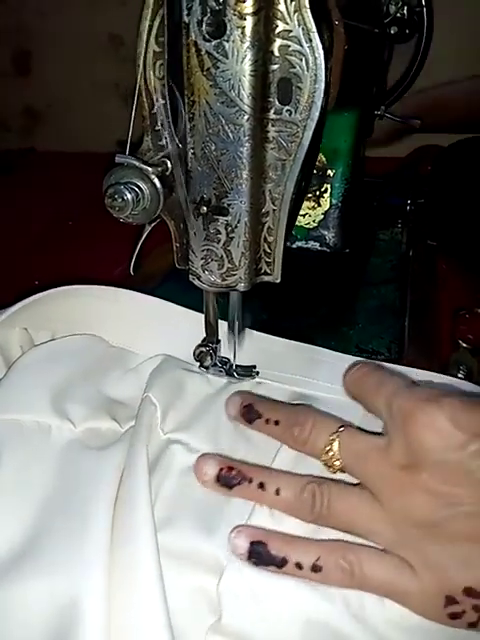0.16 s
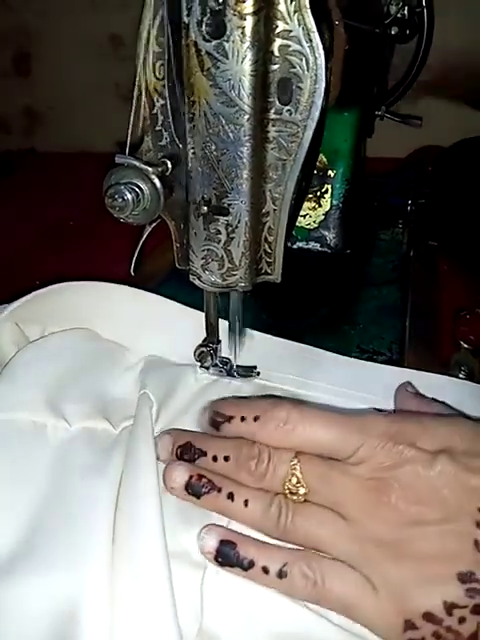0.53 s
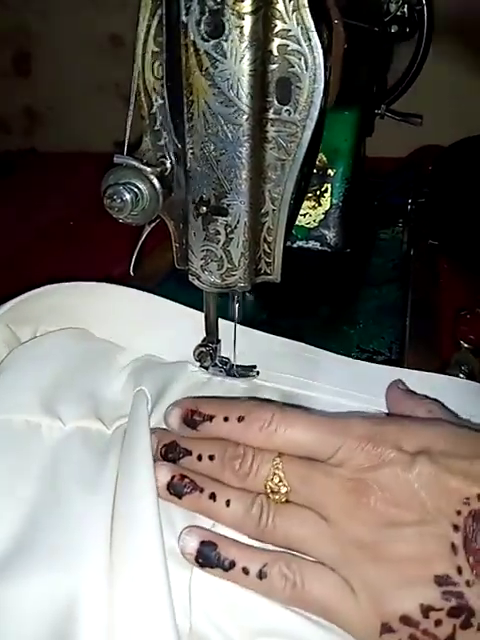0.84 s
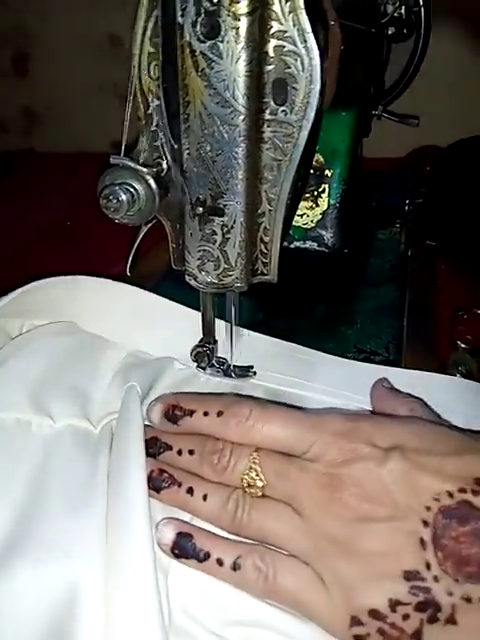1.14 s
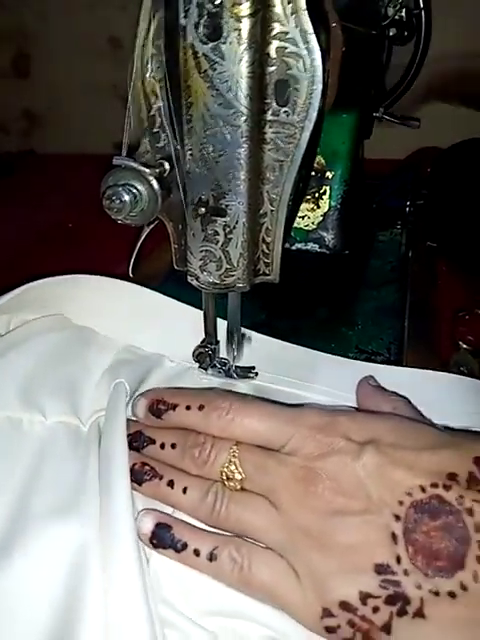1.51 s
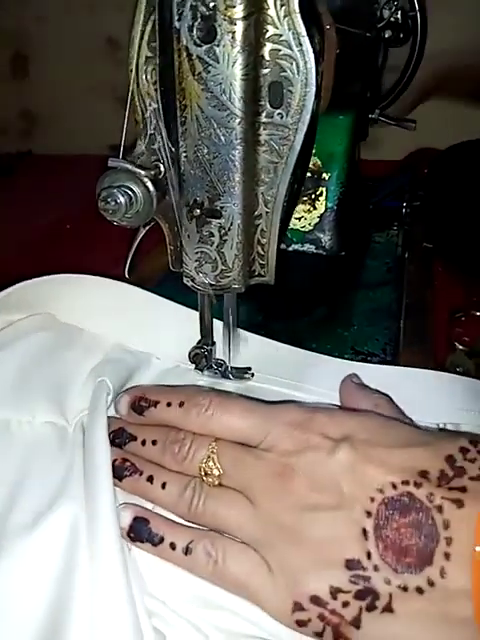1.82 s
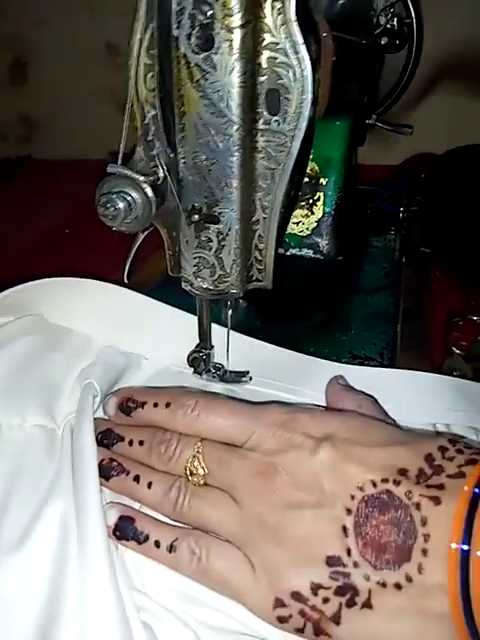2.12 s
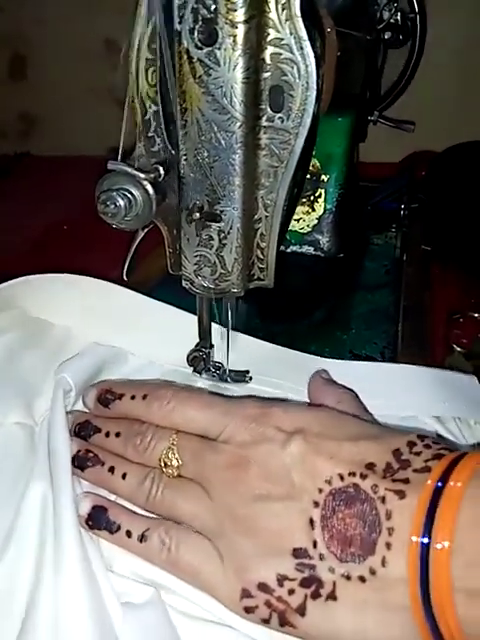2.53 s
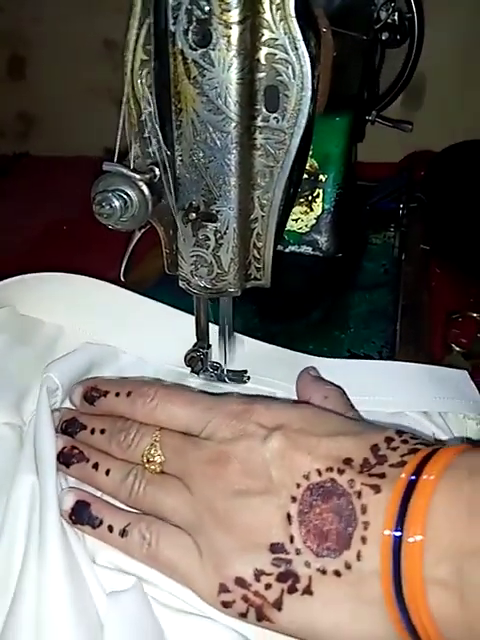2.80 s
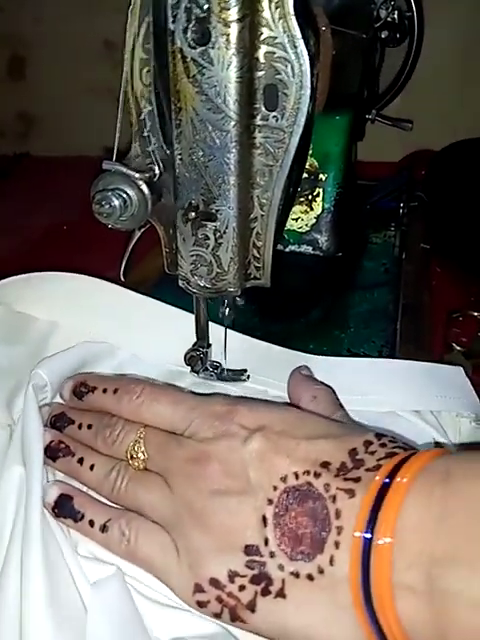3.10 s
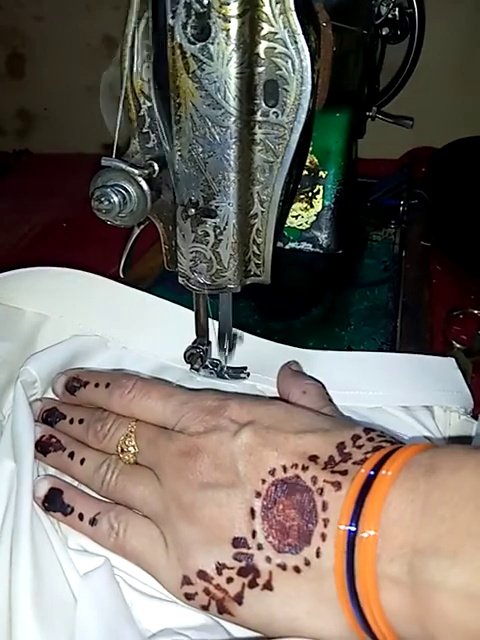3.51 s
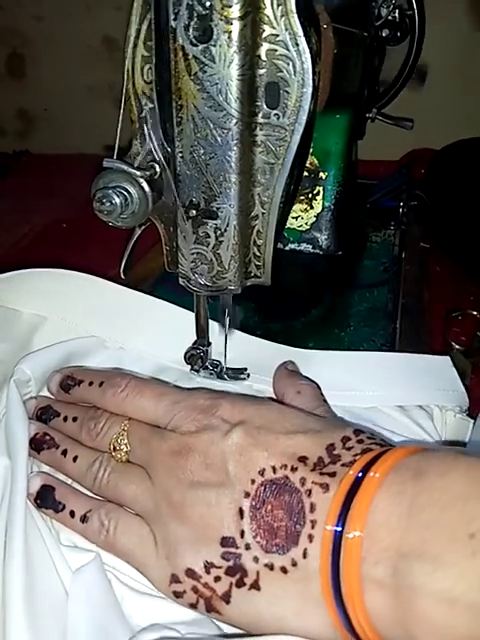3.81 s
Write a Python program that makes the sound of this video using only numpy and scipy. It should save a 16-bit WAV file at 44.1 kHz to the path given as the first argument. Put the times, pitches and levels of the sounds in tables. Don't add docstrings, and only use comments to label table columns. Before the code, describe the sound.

Sewing machine stitching cloth, heard close and dry indoors; gears rumble, needle bar clacks quickly with shuttle pings and sharp feed clicks, then the rhythm loosens, thuds spread apart and it fades to near silence.

```python
import sys
import numpy as np
from scipy import signal
from scipy.fft import rfft, irfft
from scipy.io import wavfile

SR = 44100
rng = np.random.default_rng(int(sys.argv[2]) if len(sys.argv) > 2 else 0)


def magnitude_from_level(level_db):
    exponent = np.asarray(level_db, float) / 20
    return 10 ** exponent


def wav_record(signal):
    frames = np.transpose(np.atleast_2d(signal))
    bounded = np.clip(frames, -1, 1)
    quanta = np.round(bounded * 32767).astype(np.int16)
    wavfile.write(sys.argv[1], SR, quanta)


N = 174195

# pitch_hz [Hz], level_db [dB per Hz]
TICK_COLOUR = [(350, -40), (600, -11.5), (1620, -18), (2830, -1.5), (3470, -8.5), (6400, -20), (15500, -26)]
TICK_T60_S = 0.018


def rms_one(x):
    return x / np.sqrt(np.mean(x ** 2) + 1e-20)


def drift(rate):
    count = int(N / SR * rate) + 2
    return np.interp(np.arange(N), np.linspace(0, N, num=count), rng.standard_normal(count))


def high_pass(x, order, hz):
    return signal.sosfilt(signal.butter(order, hz, "high", fs=SR, output="sos"), x)


def colour(x, points):
    size = 8192
    hz, db = np.transpose(points)
    bins_hz = np.arange(size // 2 + 1) * SR / size
    level_db = np.interp(np.log(bins_hz + 1), np.log(hz), db)
    cepstrum = irfft(level_db * np.log(10) / 20)
    cepstrum[1:size // 2] *= 2
    cepstrum[size // 2 + 1:] = 0
    kernel = irfft(np.exp(rfft(cepstrum)))
    return signal.fftconvolve(x, kernel / np.sqrt(np.sum(kernel ** 2)))[:N]


def patchy(rate, depth_db):
    edges_hz = [2000, 4000, 7500, 12000]
    rest = rng.standard_normal(N)
    out = 0
    for hz in edges_hz:
        low = signal.sosfiltfilt(signal.butter(2, hz, fs=SR, output="sos"), rest)
        out = out + low * magnitude_from_level(depth_db * drift(rate))
        rest = rest - low
    return rms_one(out + rest * magnitude_from_level(depth_db * drift(rate)))


def clicks(s, db):
    out = np.zeros(N)
    places = np.clip((np.asarray(s) * SR).astype(int), 0, N - 1)
    np.add.at(out, places, magnitude_from_level(np.asarray(db)))
    return out


def burst(s, db, t60, points, rise_s=0.00062):
    tail_db, tail_times = -14, 3.74
    hits = clicks(s, db) + 1e-18
    crack = signal.lfilter([1], [1, -magnitude_from_level(-60 / (t60 * SR))], hits)
    after = signal.lfilter([1], [1, -magnitude_from_level(-60 / (tail_times * t60 * SR))], hits)
    envelope = crack + magnitude_from_level(tail_db) * after
    r = np.exp(-1 / (rise_s * SR))
    softened = signal.lfilter([(1 - r) ** 2], [1, -2 * r, r * r], envelope)
    grit = patchy(500, depth_db=2.5)
    return colour(softened * grit, points)


def ring(x, hz, t60):
    r = magnitude_from_level(-60 / (t60 * SR))
    w = 2 * np.pi * hz / SR
    return signal.lfilter([0, np.sin(w)], [1, -2 * r * np.cos(w), r * r], x + 1e-18)


def struck(s, db, modes, spread_db):
    split = 0.00294
    luck_db = spread_db * rng.standard_normal((len(s), len(modes), 3))
    out = 0
    for k, (hz, level_db, t60) in enumerate(modes):
        for j in range(3):
            hits = clicks(s + 0.0004 * j, db + level_db - 5.5 + luck_db[:, k, j])
            out = out + ring(hits, hz * (1 + split * (j ** 1.35 - 1)), t60)
    return signal.lfilter([0.5, 0.5], [1], out)


def drive():
    # time_s [s], level_db [dB]
    effort_table = [(0, -59), (.05, -61), (.07, -55), (.21, -51.5), (.25, -48), (.45, -48), (.6, -48),
                    (.7, -45), (1.2, -44), (1.9, -41), (2.6, -43), (3.0, -46.5), (3.45, -52), (3.62, -54),
                    (3.7, -54.5), (3.78, -64.5), (3.89, -61.5), (3.95, -56)]
    # pitch_hz [Hz], level_db [dB per Hz]
    rattle_tone = [(410, -17.5), (700, -11.5), (1420, -2), (2960, 2.5), (5120, 1), (6480, -12), (7890, -15),
                   (9600, -8), (13500, -13), (16000, -13)]
    # pitch_hz [Hz], level_db [dB per Hz]
    rumble_tone = [(15, -74), (25, -40), (75, -33.5), (109, -4.5), (160, -9.5), (240, -3.5), (310, 5.5),
                   (425, -5), (591, -3), (900, -22.5), (1170, -47), (1980, -120)]
    # pitch_hz [Hz], width_hz [Hz], level_db [dB]
    frame_modes = [(1248, 50, 10.5), (2334, 330, 12.5), (3150, 80, 6), (5940, 97, 1), (15000, 1200, 8),
                   (6450, 510, 11.5)]
    grains_per_s, grain_spread_db, flutter_db = 4000, 3, 3
    sizzle_db, frame_db, rattle_db = -2, -0.5, -0.5
    patch_per_s, patch_db = 25.0, 3.5
    rumble_db, rumble_follows, rumble_flutter_db = -46.5, 0.88, 1.5

    effort_db = np.interp(np.arange(N) / SR, *np.transpose(effort_table))

    sizes = magnitude_from_level(grain_spread_db * np.minimum(rng.exponential(1, N), 4))
    contacts = sizes * (rng.random(N) < grains_per_s / SR)
    contacts = contacts * magnitude_from_level(flutter_db * drift(45)) * rng.standard_normal(N)
    grains = rms_one(contacts) + magnitude_from_level(sizzle_db) * patchy(patch_per_s, patch_db)

    frame = 0
    for hz, width, db in frame_modes:
        gain = magnitude_from_level(db + patch_db * drift(18)) * np.sqrt(width)
        frame = frame + gain * ring(grains, hz, np.log(1000) / np.pi / width)
    rattle = rms_one(colour(grains, rattle_tone)) + magnitude_from_level(frame_db) * rms_one(frame)

    rumble = colour(rng.standard_normal(N), rumble_tone)
    rumble = rumble * magnitude_from_level(rumble_flutter_db * (drift(14) + drift(4)))
    rumble_level = magnitude_from_level(rumble_db + rumble_follows * (effort_db + 45.5))
    return magnitude_from_level(effort_db + rattle_db) * rattle + rumble_level * rumble


def loose_parts():
    # start_s [s], peak_db [dB]
    bright_ticks = [(0.1364, -50), (0.172, -35), (0.2813, -33), (0.3114, -45), (0.5008, -34), (0.613, -26),
                    (0.7253, -24), (1.1897, -13), (1.2934, -26), (1.3144, -20), (1.5874, -16), (1.686, -18),
                    (1.7784, -15), (1.7844, -28), (1.89, -16), (1.936, -24), (2.1378, -17), (2.3553, -15),
                    (2.4334, -27), (2.8544, -29), (2.9826, -35), (3.121, -30), (3.25, -37), (3.4226, -35),
                    (3.4516, -33), (3.708, -49), (3.8013, -56), (3.8721, -45)]
    # pitch_hz [Hz], level_db [dB per Hz]
    bright_tone = [(1000, -28), (3000, -8.5), (6400, -2.5), (7900, -16), (9800, 2.5), (12000, -10.5),
                   (15300, -6), (16500, -6.5)]
    # start_s [s], peak_db [dB]
    dull_ticks = [(0.0333, -34.5), (0.0684, -29), (0.0765, -28.5), (0.1494, -37), (0.2047, -26),
                  (0.3721, -19), (0.5122, -23), (0.5841, -29), (0.7552, -23), (0.8712, -22), (0.9014, -34),
                  (0.982, -23), (1.2151, -26), (1.2944, -24), (1.514, -28), (1.6824, -34), (1.7834, -24),
                  (1.9794, -25), (2.2385, -22), (2.4324, -23), (2.9844, -29), (3.2134, -33), (3.2505, -41),
                  (3.3817, -32), (3.5724, -42), (3.8544, -43)]
    s, db = np.transpose(bright_ticks)
    dull_s, dull_db = np.transpose(dull_ticks)
    bright = burst(s, db - 5, 0.0068, bright_tone)
    return bright + burst(dull_s, dull_db - 9, TICK_T60_S, TICK_COLOUR)


def needle_bar():
    # start_s [s], peak_db [dB], thud_db [dB] of the thud that follows
    clack_table = [(0.0604, -30, -31.5), (0.224, -38, -28), (0.363, -14.5, -22.5), (0.5152, -28.5, -27.5),
                   (0.6317, -11.5, -28.5), (0.7459, -9.5, -25.5), (0.8617, -9, -25), (0.9718, -10, -21.5),
                   (1.074, -9, -25), (1.181, -8.5, -26), (1.2834, -9.5, -23), (1.3802, -10, -25),
                   (1.481, -9.5, -25.5), (1.5771, -17, -19.5), (1.6711, -9, -28), (1.7673, -8.5, -24.5),
                   (1.86, -14, -23), (1.9507, -13, -33), (2.045, -11.5, -24.5), (2.143, -12.5, -22.5),
                   (2.2309, -11, -24.5), (2.3279, -9.5, -28.5), (2.4213, -13.5, -22), (2.5208, -11, -28.5),
                   (2.627, -9.5, -34), (2.7359, -10.5, -25), (3.2755, -37, -60), (3.6527, -32, -23.5),
                   (3.7467, -41, -34), (3.908, -38, -26)]
    # start_s [s], peak_db [dB]
    lone_thuds = [(0.053, -32.5), (0.075, -36), (0.136, -33.5), (0.2284, -18.5), (0.31, -31.5),
                  (0.503, -27.5), (0.632, -17), (2.863, -25.5), (2.992, -24.5), (3.128, -22), (3.283, -26),
                  (3.462, -27.5), (3.566, -34.5), (3.664, -38.5), (3.749, -42.5), (3.798, -39),
                  (3.865, -43), (3.917, -34.5)]
    # pitch_hz [Hz], level_db [dB per Hz]
    clack_tone = [(290, -5), (500, -1.5), (1690, -13.5), (3060, 6), (5630, -9.5), (6420, 6.5),
                  (7100, -12.5), (9490, 5.5), (16000, -2.5)]
    # pitch_hz [Hz], level_db [dB per Hz]
    thud_tone = [(88, -48), (150, -12.5), (1200, 4), (1700, -4), (3100, 2.5), (5230, 0), (6600, 2.5),
                 (8170, -13.5), (15500, -9.5)]
    # pitch_hz [Hz], level_db [dB], t60_s [s]
    bed_modes = [(345, -13, 0.084), (311, -16, 0.14), (383, -9.5, 0.24), (501.4, -9.5, 0.19),
                 (592, 6.5, 0.066), (1223, 3.5, 0.12), (2197, 7.5, 0.019), (3117, 15.5, 0.015)]
    clack_db, clack_t60_s = -7.5, 0.019
    thud_db, thud_t60_s, thud_lag_s, bed_ring_db = -6.5, 0.037, 0.0095, -17
    table_hz, table_t60_s, table_db = 274.7, 0.27, -14.5
    table_from_s, early_table_db = 2.95, -19

    s, db, after_db = np.transpose(clack_table)
    lone_s, lone_db = np.transpose(lone_thuds)
    clack = burst(s, db + clack_db, clack_t60_s, clack_tone)

    all_s = np.r_[s + thud_lag_s, lone_s]
    all_db = np.r_[after_db + 0.4 * (db + 16), lone_db]
    thud = burst(all_s, all_db + thud_db, thud_t60_s, thud_tone, rise_s=0.0014)
    bed = struck(all_s, all_db + bed_ring_db, bed_modes, spread_db=3.5)

    top_db = lone_db + table_db + early_table_db * (lone_s < table_from_s)
    table = ring(clicks(lone_s, top_db), table_hz, table_t60_s)
    return clack + thud + bed + table


def take_up():
    # start_s [s], peak_db [dB]
    lever_ticks = [(0.1671, -27.5), (0.344, -22.5), (0.484, -26.5), (0.613, -48), (0.7282, -20.5),
                   (0.8463, -23.5), (0.9583, -24), (1.06, -22), (1.1672, -20.5), (1.269, -21.5),
                   (1.367, -19), (1.468, -28), (1.565, -17), (1.657, -22.5), (1.753, -23.5), (1.85, -17),
                   (1.938, -16.5), (2.0322, -20), (2.1263, -14.5), (2.2183, -15), (2.3116, -20),
                   (2.407, -23.5), (2.5065, -24), (2.611, -25), (2.7204, -25.5), (2.8384, -24),
                   (2.964, -22.5), (3.101, -22.5), (3.447, -30), (3.6446, -34)]
    ring_hz, ring_t60_s, ring_db = 2845, 0.038, -18
    s, db = np.transpose(lever_ticks)
    modes = [(ring_hz, 0, ring_t60_s), (1.7 * ring_hz, -9, ring_t60_s)]
    ringing = struck(s + 0.001013, db + ring_db, modes, spread_db=5.0)
    return burst(s, db - 5.5, TICK_T60_S, TICK_COLOUR, rise_s=0.00081) + ringing


def shuttle():
    # start_s [s], peak_db [dB]
    strikes = [(.243, -38), (.3396, -44), (0.423, -21), (.6674, -32), (0.7892, -20.5), (1.118, -19.5),
               (1.423, -20), (1.709, -21.5), (1.989, -18.5), (2.271, -18), (2.462, -18), (2.5626, -20),
               (2.6622, -18.5), (2.783, -22.5), (2.9075, -21), (3.0304, -18.5), (3.1896, -27),
               (3.3491, -24), (3.5152, -23.5)]
    # pitch_hz [Hz], level_db [dB per Hz]
    crack_tone = [(290, -30), (500, -8.5), (1720, -12.5), (6510, -6.5), (7750, -19), (11100, -13),
                  (13300, -20), (14700, 2.5), (16000, -11.5)]
    # pitch_hz [Hz], level_db [dB], t60_s [s]
    steel_modes = [(3680, -7.5, 0.16), (4560, -2, 0.081), (5838, -7, 0.25), (6430, 0, .035),
                   (8460, -6, 0.076), (11150, 0.5, 0.19), (11230, 12, 0.035), (12050, -12, .08),
                   (14200, 9, 0.081), (14740, 5, .12), (15300, -4, .08)]
    crack_db, crack_t60_s, ring_db, wobble_db = -1, 0.018, -14.5, 3.5
    s, db = np.transpose(strikes)
    crack = burst(s, db + crack_db, crack_t60_s, crack_tone)
    ringing = struck(s, db + ring_db, steel_modes, spread_db=2.5)
    return crack + magnitude_from_level(wobble_db * drift(160)) * ringing


def feed():
    # start_s [s], peak_db [dB]
    feed_clicks = [(0.3022, -46), (0.5744, -42), (0.688, -30), (0.803, -27.5), (0.92, -27.5), (1.024, -25),
                   (1.129, -22.5), (1.234, -26.5), (1.331, -25.5), (1.431, -25), (1.5307, -24.5),
                   (1.6243, -23.5), (1.719, -21), (1.8159, -21.5), (1.905, -23.5), (2.0016, -22),
                   (2.0942, -24), (2.185, -24.5), (2.28, -23), (2.375, -23.5), (2.4716, -25.5),
                   (2.571, -22.5), (2.6796, -26), (2.795, -24.5), (2.8843, -45), (2.919, -29.5)]
    # pitch_hz [Hz], level_db [dB per Hz]
    feed_tone = [(880, -37), (1500, -22.5), (4240, -16), (5540, -26.5), (6310, -13), (7840, -29),
                 (10000, -7), (11300, -21), (13000, -16), (16000, -20.5)]
    s, db = np.transpose(feed_clicks)
    return burst(s, db + 3, 0.02, feed_tone)


def room(x):
    room_db, room_t60_s = -12, 0.38
    t = np.arange(SR // 2) / SR
    tail = rng.standard_normal(SR // 2) * magnitude_from_level(-60 * t / room_t60_s) * (t > 0.003)
    return magnitude_from_level(room_db) * signal.fftconvolve(x, tail / np.sqrt(np.sum(tail ** 2)))[:N]


def scene():
    hits = loose_parts() + needle_bar() + take_up() + shuttle() + feed()
    machine = drive() + high_pass(hits, 4, 217)
    hiss = magnitude_from_level(-79) * rng.standard_normal(N)
    return (machine + room(machine) + hiss)[None]


def band_limit(x):
    return signal.sosfilt(signal.butter(12, 16800, fs=SR, output="sos"), x)


def record(dry):
    # pitch_hz [Hz], level_db [dB]
    port_tone = [(7000, 0.23), (11500, -0.26), (12300, -4), (12800, 0), (13300, -3), (13600, -1),
                 (13950, -8), (14300, 0), (15500, 0.5), (15800, 2.5)]
    thin = high_pass(colour(dry[0], port_tone)[None], 2, 85)
    cut = signal.sosfilt(signal.cheby2(20, 45, 16050, fs=SR, output="sos"), thin)
    return band_limit(cut)


dry = scene()
out = record(dry)
wav_record(out)
```